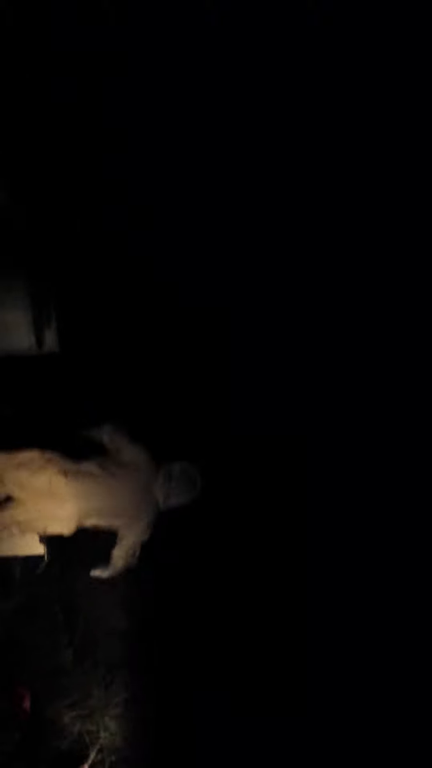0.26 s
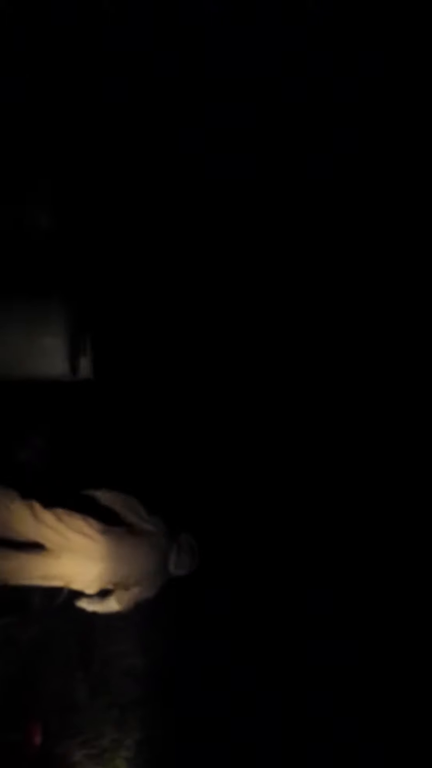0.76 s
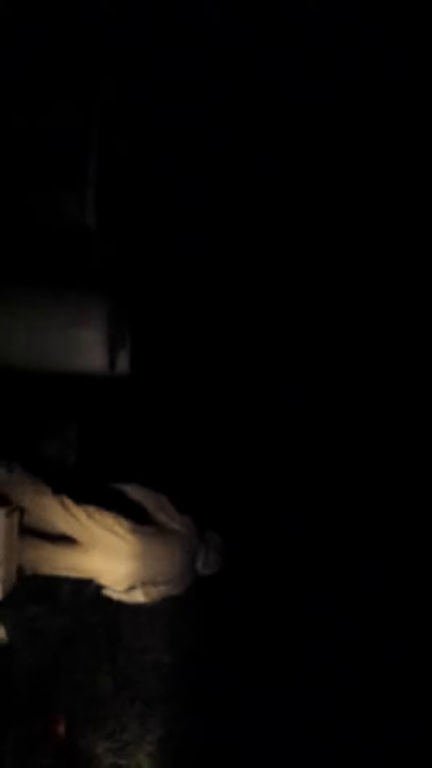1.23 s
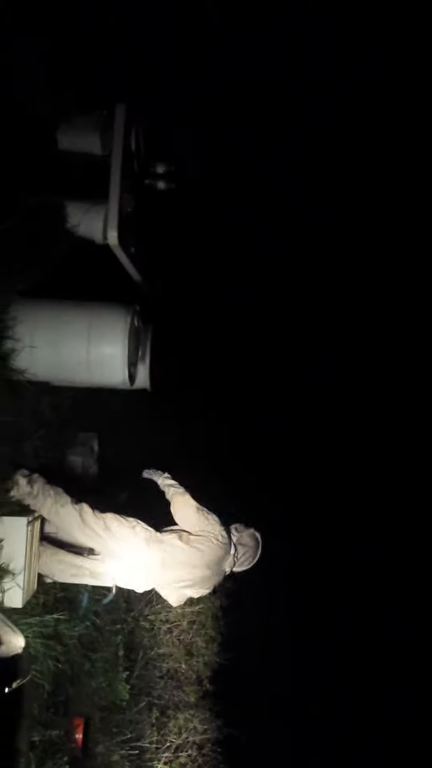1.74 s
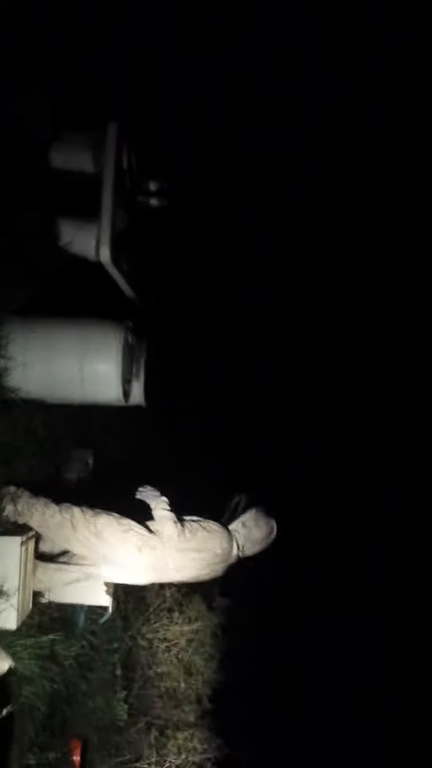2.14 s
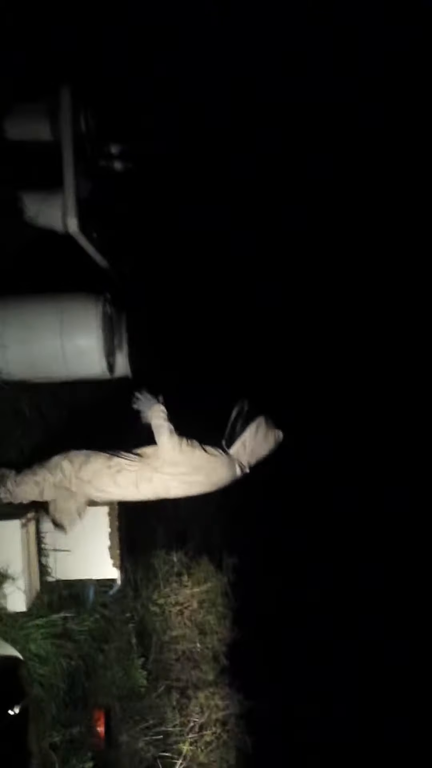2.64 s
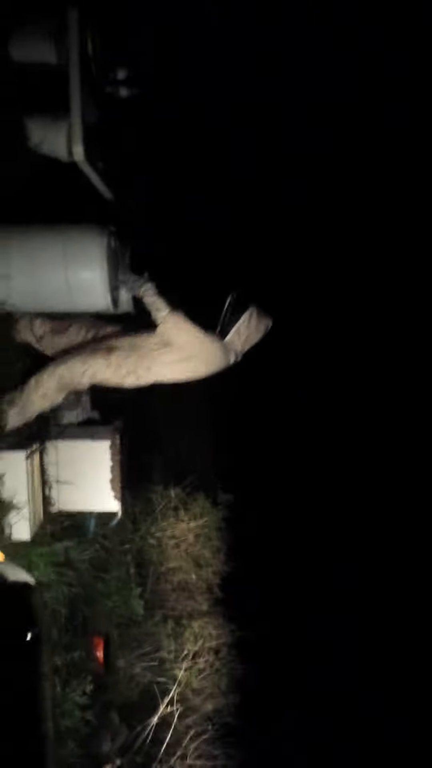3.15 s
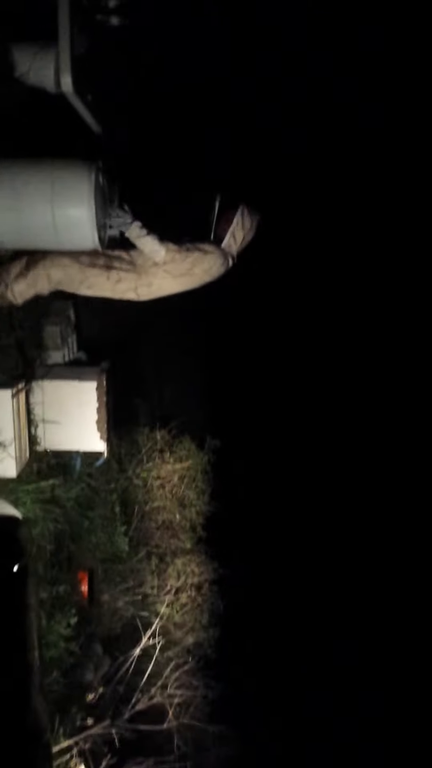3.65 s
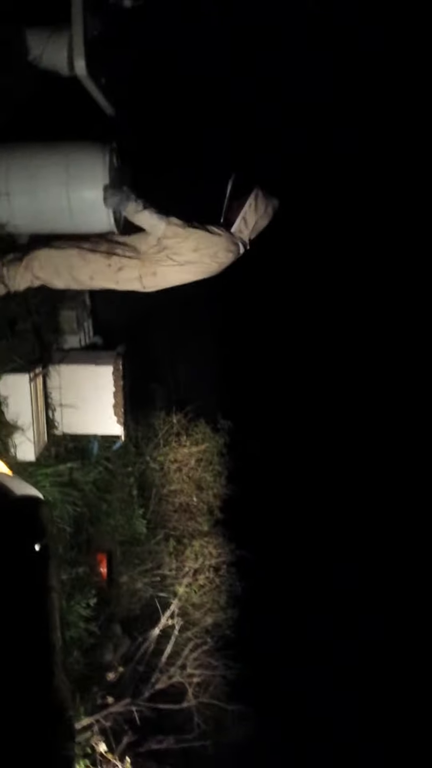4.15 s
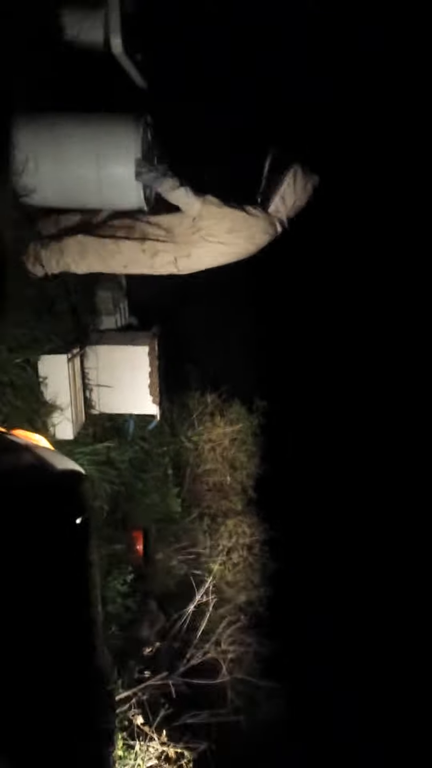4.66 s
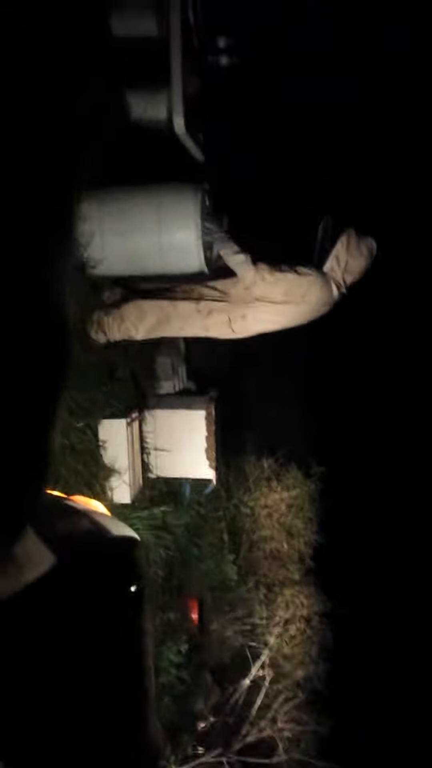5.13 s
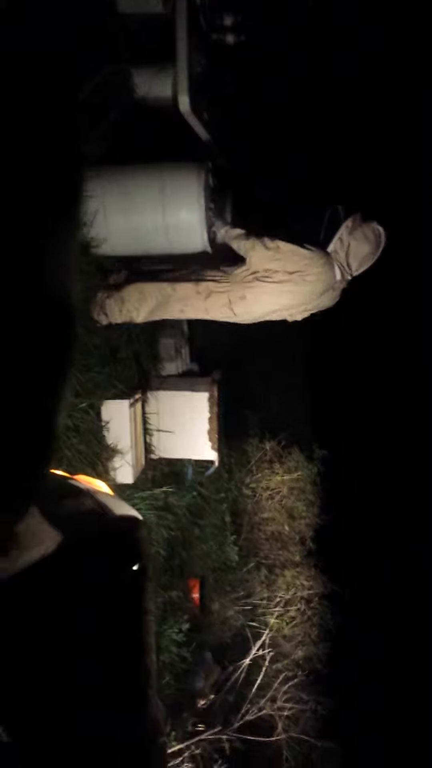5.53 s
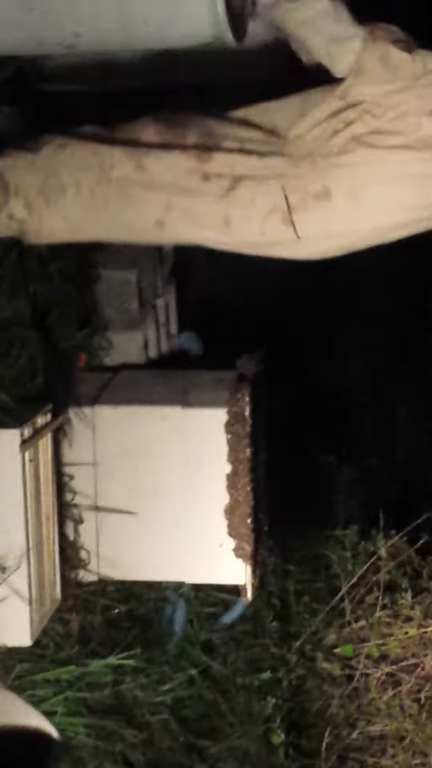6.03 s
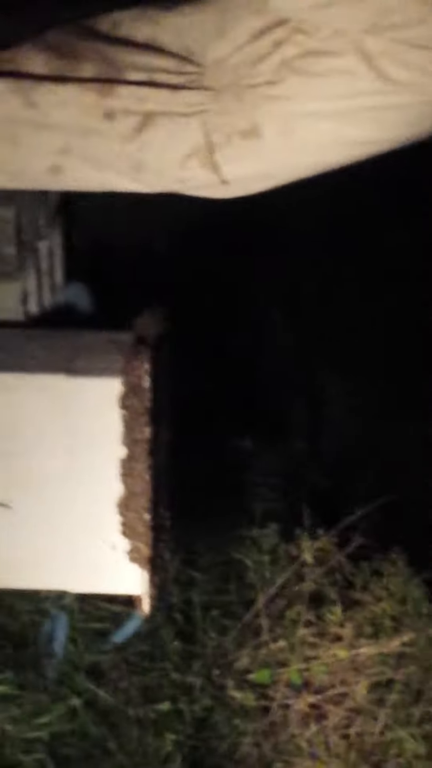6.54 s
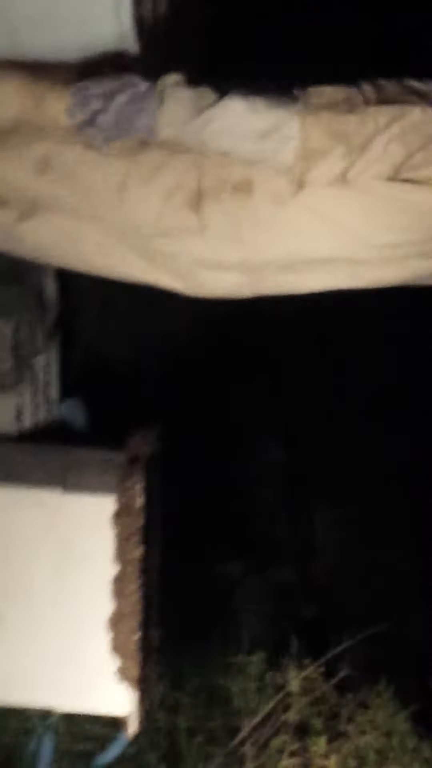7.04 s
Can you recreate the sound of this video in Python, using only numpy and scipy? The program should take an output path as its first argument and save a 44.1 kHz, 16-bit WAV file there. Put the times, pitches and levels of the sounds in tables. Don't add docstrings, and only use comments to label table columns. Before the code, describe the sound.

Outdoors at night, a shimmering cricket chorus continues as stiff fabric rustles, a box lid knocks and sharp handling clicks hit the microphone.

```python
import sys
import numpy as np
from scipy import signal
from scipy.fft import rfft, irfft, next_fast_len
from scipy.io import wavfile
from scipy.ndimage import uniform_filter1d

SR = 44100
rng = np.random.default_rng(int(sys.argv[2]) if len(sys.argv) > 2 else 0)


def level_to_linear(level):
    exponent = np.asarray(level, float) / 20
    return 10 ** exponent


def persist_wave(psi):
    counts = np.round(np.clip(psi, -1, 1) * 32767).astype(np.int16)
    wavfile.write(sys.argv[1], SR, np.atleast_2d(counts).T)


N = 321489

# pitch at stroke end in Hz, fall over a stroke in Hz, strokes per second,
# level in dB, left minus right in dB.
SINGERS = [(5280, 800, 37.2, -49, 5), (5450, 700, 39.3, -50.5, 1), (5330, 750, 35.9, -51, -2),
           (6150, 350, 41, -57.5, 0), (6290, 150, 19.8, -58.5, 2), (8350, 150, 56.8, -61, -3)]
# time in seconds, level in dB, left minus right in dB.
SWELL = [(.3, -4, -2), (.8, -2, 6.5), (1.3, -2, 5), (1.8, -3, 6), (2.3, -1, 3), (2.8, -3.5, 0),
         (3.3, -6, 3), (3.8, -4, 5), (4.3, -4, 4), (4.8, -3, 2), (5.3, -0.5, 0), (5.8, -3, 0),
         (6.3, -5.5, -1.5), (6.8, -2, 2.5), (7.29, -3, 0)]
SHORT_SHARE, SHARE_PER_KHZ = 0.4, 0.5
CHORUS_HZ, CHORUS_SPREAD_HZ, CHORUS_FALL_HZ, CHORUS_DB = 5300, 600, 600, -52.5
# frequency in Hz, level in dB per Hz.
RUMBLE = [(24, -37), (40, -7.5), (112, -3.5), (149, -3), (171, -8.5), (278, -8), (531, -17), (637, -14.5),
          (898, -19.5), (1030, -18), (1290, -24.5), (1780, -23.5), (2670, -29), (5000, -34), (6500, -68),
          (11000, -120)]
# frequency in Hz, level in dB per Hz.
HISS = [(3940, -19), (6700, 0.5), (7960, -4.5), (8660, -12), (8970, -12), (10000, -15.5), (13900, -15),
        (14400, -14)]
RUMBLE_DB, HISS_DB = -38.5, -50
# frequency in Hz, likeness from -1 to 1.
LIKENESS = [(60, 1), (180, 0.91), (550, 0.88), (1650, 0.052), (4970, -0.28), (15000, 0.2)]
# time in seconds, level in dB.
ENGINE = [(.3, -44.5), (.7, -43), (1.5, -68), (1.62, -42), (3.0, -44), (3.45, -51), (4.1, -34),
          (4.6, -41.5), (5.2, -50.5), (7.29, -46)]
ENGINE_HZ, ENGINE_WAVER_DB = 51.4, 2.5

# time in seconds, peak in dB, left minus right in dB, low ring in dB
# against the main one, ring length in seconds.
TICKS = [
    (0.3651, -31, 3, -27, 0.00062),
    (0.412, -27, 12, -11, 0.00055),
    (4.802, -25, 24, -8, 0.00062),
    (4.8128, -14.5, 19, -9, 0.00035),
    (4.9086, -0.5, 22, -5.5, 0.0006),
    (5.1175, -9, 18, -4.5, 0.00047),
    (5.454, -33, 21, -7, 0.00031),
    (6.2707, -31, 22, -2, 0.00042),
]
# frequency in Hz, level in dB, length as a factor on the main ring.
TICK_LOW = [(670, -5, 1.2), (2340, -10, 1.8), (3600, 5, 0.51)]
TICK_HZ = 6550
# time in seconds, peak in dB, left minus right in dB, ring in Hz.
SNAPS = [
    (0.4955, -34, 5, 9000),
    (3.299, -36, 1, 9670),
    (3.3132, -23, 6, 8660),
    (3.583, -24, 8, 7900),
    (5.1796, -51, -10.5, 14000),
    (5.22, -47, -9, 9100),
    (6.449, -39, -12, 12500),
    (7.2604, -32, -6, 8850),
]
SNAP_LOW_DB, SNAP_S = -23, 0.0012
# time in seconds, peak in dB, length in seconds, low band in dB
# and middle band in dB against the upper band.
SCRAPES = [(0.5094, -13.5, 0.0085, -16, -6.5), (0.512, -22, 0.024, -4, -30),
           (1.2537, -4.5, 0.0073, -14.5, -41), (1.256, -9.5, 0.0128, -6.5, 0),
           (1.263, -21.5, 0.023, -3, -6), (1.3261, -9.5, 0.013, -35, -7), (1.3291, -9.5, 0.0084, 2, 8.5),
           (4.404, -11.5, 0.012, -36, -30), (4.432, -22, 0.007, -24, -11), (4.835, -17, 0.0507, 12.5, -3),
           (4.861, -23, 0.019, 17, 4)]
RUBS = [
    (4.622, -25.5, 0.04, 14, -8),
    (4.637, -21, 0.035, 8.5, 8.5),
]
# center in Hz, width in Hz, level in dB.
SCRAPE_BANDS = [(1300, 2200, 0), (4250, 1900, 0), (6900, 2800, 0), (11500, 3500, -14)]
LID_PAN_DB, PORT_PAN_DB = 4.5, 16
# time in seconds, peak in dB, left minus right in dB,
# strongest panel tone in Hz, time to fall 60 dB in seconds.
KNOCKS = [
    (0.513, -19, 9, 585, 0.088),
    (1.335, -24.5, 9, 610, 0.058),
    (4.404, -16.5, -0.5, 767, 0.08),
    (4.417, -19, -6, 933, 0.038),
    (4.431, -29.5, -2, 410, 0.17),
]
# frequency in Hz, level in dB, time to fall 60 dB in seconds (unused: each
BOX_TONES = [(439, -3, 0.16), (600, 22, 0.09), (756, 0, 0.11), (980, -27, 0.75), (2400, -39, 0.096)]

# start in seconds, loudest moment in seconds, end in seconds,
# level in dB, left minus right in dB.
SWISHES = [
    (2.1, 2.6, 3.0, -55.5, 8.5),
    (2.89, 3.019, 3.29, -49, 5.5),
    (3.334, 3.595, 3.97, -47, 7.5),
    (4.204, 4.45, 4.75, -48.5, 7.5),
    (6.443, 6.452, 5.5, -58, -15),
    (6.95, 7.15, 7.25, -58.5, 12),
    (7.202, 7.265, 7.33, -53, 1),
]
# frequency in Hz, level in dB per Hz.
CLOTH = [(1470, -43), (2500, -13), (4300, -10), (5090, -8), (5810, -3.5), (6820, -0.5), (8310, -5.5),
         (11200, -13), (14400, -15.5)]
# start in seconds, loudest moment in seconds,
# end in seconds, level in dB.
SLIDES = [
    (2.276, 2.444, 3.16, -45.5),
    (4.392, 4.423, 5.1, -38),
    (6.197, 6.455, 6.75, -40),
    (6.651, 6.84, 7.6, -41.5),
]
# time in seconds, peak in dB.
SLIPS = [
    (2.7594, -30),
    (6.7755, -42),
    (6.6134, -50),
    (6.6737, -46),
    (6.7305, -49),
    (6.8972, -45),
    (6.9292, -48),
]
# start in seconds, loudest moment in seconds,
# end in seconds, level in dB.
GRIP = [
    (3.894, 3.884, 3.89, -27),
    (3.94, 4.008, 4.06, -29),
    (4.074, 4.128, 4.31, -29),
    (4.391, 4.404, 4.627, -24),
    (4.725, 4.78, 4.7, -39),
]
# time in seconds, peak in dB, tone in Hz, time to fall 60 dB in seconds.
BUMPS = [
    (3.974, -43, 143.6, 0.042),
    (3.995, -25, 80, 0.069),
    (4.113, -44, 124, 0.046),
    (4.138, -16.5, 107, 0.054),
    (4.208, -29, 107, 0.038),
    (4.268, -28, 129.3, 0.028),
    (4.404, -7, 168, 0.048),
    (4.4055, -17.5, 419, 0.077),
    (4.445, -19, 166, 0.044),
    (4.557, -23, 74, 0.13),
]
# start in seconds, end in seconds, slips per second, level in dB.
CREAKS = [
    (6.304, 6.35, 46, -46),
    (6.3624, 6.385, 62, -42),
    (6.3948, 6.555, 70, -37.5),
    (6.823, 6.9, 72, -39.5),
]
CREAK_SAG_DB_PER_S, CREAK_SPREAD_DB, CREAK_JITTER_S = -50, 1.8, 0.001
STROKE_ENDS_DB = -11

# frequency in Hz, left minus right in dB.
PORTS = [(60, 0.5), (400, -0.5), (1300, -2), (4400, -0.5), (8100, -3), (9500, -4.5), (11000, -12.5),
         (15000, -4.5)]
# frequency in Hz, share of time at left, share at right.
EMPTIED = [(2600, 0, 0), (3300, .16, .14), (4700, .14, .2), (5200, 0, 0), (9200, .02, .03), (9800, .8, .1),
           (14550, .9, .27), (14750, 1, 1)]
BASS_CUT_HZ, EDGE_HZ = 40, 15700
START_S, FADE_IN_S = 0.27, 0.32
DUCK_S, DUCK_DB, DUCK_FALL_S = 4.883, -11, 0.12
RECOVER_S, RECOVER_SPREAD_S = 6.107, 0.11


def evened(x):
    return x / np.sqrt(np.mean(x ** 2) + 1e-20)


def read(points, hz):
    f, value = np.transpose(points)
    return np.interp(np.log(hz + 1), np.log(f + 1), value)


def follow(rows):
    s, *columns = np.transpose(rows)
    return [np.interp(np.arange(N) / SR, s, c) for c in columns]


def sides(pan_db):
    return level_to_linear(np.array([pan_db / 2, -pan_db / 2]))


def gain_db(s):
    ramp = 20 * np.log10(np.clip((s - START_S) / FADE_IN_S, 1e-4, 1))
    sunk = 1 - np.exp(-np.maximum(s - DUCK_S, 0) / DUCK_FALL_S)
    return ramp + DUCK_DB * sunk / (1 + np.exp((s - RECOVER_S) / RECOVER_SPREAD_S))


def add(mix, s, db, pan_db, sound):
    part = mix[:, round(s * SR):][:, :sound.shape[-1]]
    gains = level_to_linear(db - gain_db(s)) * sides(pan_db)[:, None]
    part += (gains * sound / abs(sound).max())[:, :part.shape[1]]


def stroke(start, top, end, db):
    t = np.arange(N) / SR
    edge = np.clip(np.minimum(t - start, end + 0.037 - t) / 0.02, 0, 1)
    swell = np.interp(t, [start, top, end], [STROKE_ENDS_DB, 0, STROKE_ENDS_DB])
    return edge * level_to_linear(db - gain_db(top) + swell)


def resonate(x, hz, width_hz):
    return signal.lfilter(*signal.iirpeak(hz, hz / width_hz, SR), x)


def drift(rate_hz):
    f = np.geomspace(rate_hz / 10, rate_hz, 12)[:, None]
    t = np.arange(0, N + 400, 400) / SR
    waves = np.sin(2 * np.pi * (f * t + rng.random(f.shape)))
    slow = (waves / np.sqrt(f)).sum(0)
    return np.interp(np.arange(N) / SR, t, evened(slow))


def wash(spectrum, patchy_db):
    hz = np.fft.rfftfreq(2048, 1 / SR)
    a, b, c, d, patches = rng.standard_normal((N // 512 + 5, 1025, 5)).T
    patches = uniform_filter1d(patches, size=24, axis=0)
    patches = evened(uniform_filter1d(patches, size=7, axis=1))
    same = np.clip(read(LIKENESS, hz), -1, 1)[:, None]
    left = a + 1j * b
    right = same * left + np.sqrt(1 - same ** 2) * (c + 1j * d)
    z = np.array([left, right]) * level_to_linear(read(spectrum, hz)[:, None] + patchy_db * patches)
    x = signal.istft(z, nperseg=2048, noverlap=1536)[1][:, :N]
    return x / np.sqrt(np.mean(x.mean(0) ** 2))


def leaves(x, t60, wet_db):
    t = np.arange(6000) / SR
    tail = rng.standard_normal((2, 6000)) * level_to_linear(-60 * t / t60) * (t > 0.002)
    return x + level_to_linear(wet_db) * signal.oaconvolve(x, tail / np.linalg.norm(tail[0]), axes=1)[:, :N]


def trill(hz, fall_hz, per_s, share, unsteady):
    turns = np.cumsum(per_s * (1 + unsteady * drift(3))) / SR + rng.random()
    place = np.minimum(turns % 1 / share, 1)
    strength = level_to_linear(2.0 * rng.standard_normal(600))[turns.astype(int) % 600]
    shape = np.sqrt(abs(np.sin(np.pi * place))) * (place < 1)
    pitch = hz * (1 + 0.0037 * drift(4)) + fall_hz * (1 - place)
    return evened(strength * shape * np.sin(2 * np.pi * np.cumsum(pitch) / SR))


def crickets():
    near, far = np.zeros((2, N)), np.zeros((2, N))
    for hz, fall, per_s, db, pan in SINGERS:
        song = trill(hz, fall, per_s, SHORT_SHARE + SHARE_PER_KHZ * fall / 1000, 0.017)
        near += level_to_linear(db + 3.07 * drift(2.514)) * sides(pan)[:, None] * song
    for f, r, p in rng.random((10, 3)):
        song = trill(CHORUS_HZ + CHORUS_SPREAD_HZ * f, CHORUS_FALL_HZ, 35 + 5.5 * r, 1.0, 0.02)
        far += sides(24 * (p - 0.5))[:, None] * song
    near = leaves(near, 0.07, -3)
    far = level_to_linear(CHORUS_DB) * leaves(evened(far), 0.2, 8.0)
    swell_db, pan_db = follow(SWELL)
    return level_to_linear(swell_db) * sides(pan_db) * (near + far)


def distance():
    return level_to_linear(RUMBLE_DB) * wash(RUMBLE, 1.43) + level_to_linear(HISS_DB) * wash(HISS, 0.89)


def engine():
    turns = 2 * np.pi * np.cumsum(ENGINE_HZ + 0.8 * drift(2.74)) / SR
    level_db = follow(ENGINE)[0] + ENGINE_WAVER_DB * drift(8)
    return level_to_linear(level_db) * np.sin([turns, turns - 0.9])


def tick(hz, low_db, length):
    late = np.maximum(np.arange(400) / SR - np.array([[0.0008], [0.0011]]), 0)
    turns = 2 * np.pi * late * [[1], [1.05]]
    ring = np.sin(hz * turns) + 0.27 * np.sin(1.27 * hz * turns)
    ring *= -np.exp(-(late / length) ** 3)
    for f, db, longer in TICK_LOW:
        fade = np.exp(-(late / length / longer) ** 2)
        ring += np.sign(1500 - f) * level_to_linear(low_db + db) * fade * np.sin(f * turns)
    return ring


def finger_ticks():
    out = np.zeros((2, N))
    for s, db, pan, low_db, length in TICKS:
        add(out, s, db, pan, tick(TICK_HZ, low_db, length))
    return out


def grass_snaps():
    out = np.zeros((2, N))
    for s, db, pan, hz in SNAPS:
        add(out, s, db, pan, tick(hz, SNAP_LOW_DB, SNAP_S))
    return out


def scrapes():
    out = np.zeros((2, N))
    rows = [(LID_PAN_DB, *row) for row in SCRAPES] + [(PORT_PAN_DB, *row) for row in RUBS]
    for pan, s, db, length, low_db, middle_db in rows:
        u = np.arange(4000) / SR / length
        rise = np.clip(8.0 * length + 0.15, 0.02, 0.6)
        shape = np.minimum(u / rise, 1) * np.exp(-3 * np.maximum(u - rise, 0) ** 0.94)
        slips = rng.standard_normal((2, 4000)) * level_to_linear(4.83 * rng.standard_normal(200)).repeat(20)
        low, middle, upper, top = [level_to_linear(d) * evened(resonate(resonate(slips, hz, w), hz, w))
                                   for hz, w, d in SCRAPE_BANDS]
        add(out, s, db, pan, shape * (level_to_linear(low_db) * low + level_to_linear(middle_db) * middle + upper + top))
    return out


def knocks():
    out, t = np.zeros((2, N)), np.arange(5000) / SR
    for s, db, pan, panel_hz, t60 in KNOCKS:
        fade = level_to_linear(-60 * t / t60)
        blow = rng.standard_normal((2, len(t))) * fade
        tones = list(BOX_TONES[1:]) + [(panel_hz, 0, 0)]
        ring = sum(level_to_linear(d) * resonate(blow, hz, 120) for hz, d, _ in tones)
        panel = 0.6 * fade * np.sin(2 * np.pi * panel_hz * t)
        chatter = 0.7 * resonate(blow, 850, 1100)
        add(out, s, db, pan, ring + 0.5 * ring[::-1] + panel + chatter)
    return out


def flicker():
    return evened(level_to_linear(1.9 * evened(uniform_filter1d(rng.standard_normal(N), size=120))))


def swishes():
    level = sum(stroke(*row) * level_to_linear(5.5) * sides(pan)[:, None] for *row, pan in SWISHES)
    return flicker() * level * wash(CLOTH, 1.9)


def glove_slides():
    level = sum(stroke(*row) for row in SLIDES) * level_to_linear(-7.5) * sides(15.0)[:, None]
    glove = evened(resonate(resonate(rng.standard_normal((2, N)), 700, 1000), 700, 1000))
    return flicker() * level * glove


def glove_slips():
    out, t = np.zeros((2, N)), np.arange(300) / SR
    slips = list(SLIPS)
    for start, end, per_s, db in CREAKS:
        for s in np.arange(start, end, 1 / per_s):
            slip_db = db + CREAK_SAG_DB_PER_S * (s + CREAK_JITTER_S * 0 - start)
            slip_db += CREAK_SPREAD_DB * rng.standard_normal()
            slips.append((s + CREAK_JITTER_S * rng.standard_normal(), slip_db))
    for s, db in slips:
        a, b, c = rng.random(3)
        low = np.sin(2 * np.pi * (2150 + 300 * a) * t) + 0.4 * np.sin(2 * np.pi * 3300 * t)
        bright = np.sin(2 * np.pi * (7000 + 1200 * b) * t)
        add(out, s, db + 3, 1.5 + 6 * c, (low + level_to_linear(-6) * bright) * t * np.exp(-t / 0.0007))
    return out


def grip():
    rub = evened(resonate(resonate(rng.standard_normal((2, N)), 126.4, 136), 113, 110))
    both = np.array([rub[0], 0.5 * rub[0] + 0.75 * rub[1]])
    return sum(stroke(*row) for row in GRIP) * both


def bumps():
    out, t = np.zeros((2, N)), np.arange(5000) / SR
    for s, db, hz, t60 in BUMPS:
        thud = level_to_linear(-60 * t / t60) * np.sin(2 * np.pi * hz * t)
        add(out, s, db, 0, thud * (1 - np.exp(-t / 0.0014)))
    return out


def scene():
    surroundings = crickets() + distance() + engine()
    box = leaves(scrapes(), 0.24, -32) + knocks()
    walking = grass_snaps() + swishes()
    hands = finger_ticks() + glove_slides() + glove_slips() + grip() + bumps()
    return surroundings + box + walking + hands


def empty_bands(x):
    hz, _, z = signal.stft(x, SR, "cosine", nperseg=2048, noverlap=1024)
    power = uniform_filter1d(abs(z) ** 2, size=12, axis=1)
    power = power[:, ::8].repeat(8, axis=1)[:, :len(hz)]
    rank = power.argsort(axis=2).argsort(axis=2) / z.shape[2]
    f, left, right = np.transpose(EMPTIED)
    share = np.array([np.interp(hz, f, left), np.interp(hz, f, right)])[..., None]
    return signal.istft(z * (rank >= share), SR, "cosine", nperseg=2048, noverlap=1024)[1][:, :N]


def top_cut(x):
    return signal.sosfilt(signal.butter(12, 15880, fs=SR, output="sos"), x)


def record(dry):
    size = next_fast_len(N + SR)
    hz = np.fft.rfftfreq(size, 1 / SR)
    band = 1 / np.sqrt((1 + (BASS_CUT_HZ / (hz + 1)) ** 6) * (1 + (hz / EDGE_HZ) ** 60))
    ports = irfft(rfft(dry, size) * band * sides(read(PORTS, hz)), size)[:, :N]
    gain = level_to_linear(gain_db(np.arange(N) / SR))
    gained = np.clip(ports * gain, -0.9, 0.9)
    return top_cut(empty_bands(gained / gain) * gain)


dry = scene()
out = record(dry)
persist_wave(out)
```